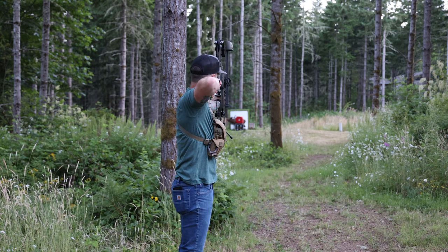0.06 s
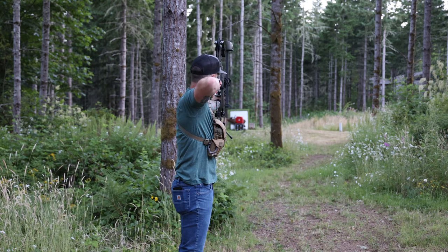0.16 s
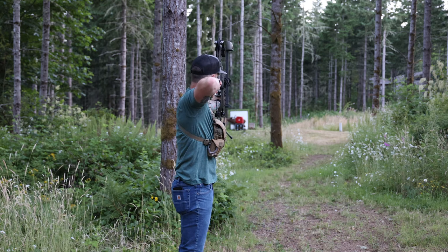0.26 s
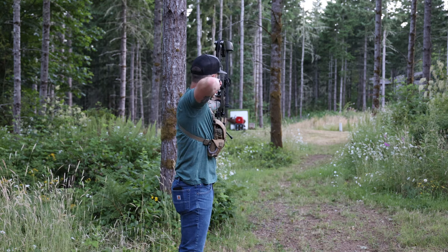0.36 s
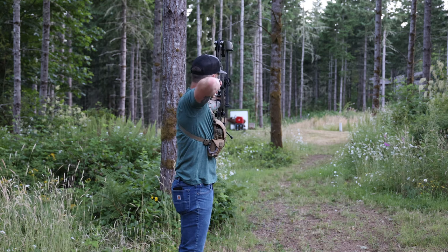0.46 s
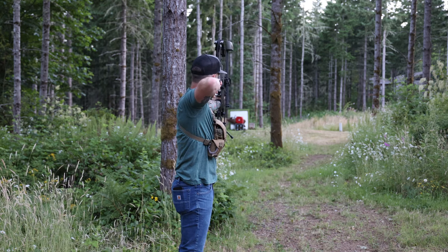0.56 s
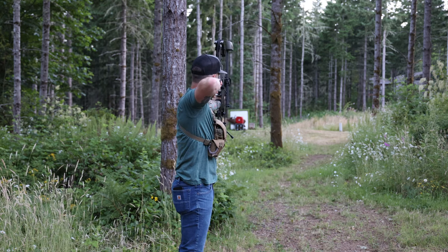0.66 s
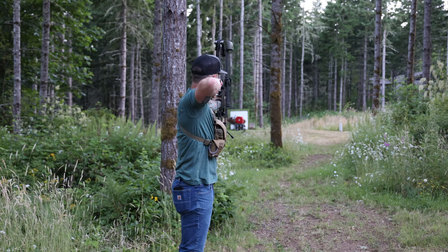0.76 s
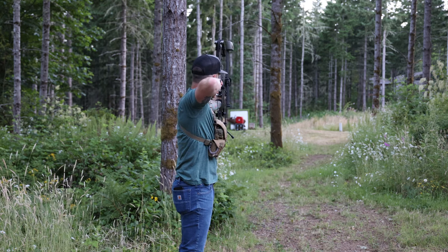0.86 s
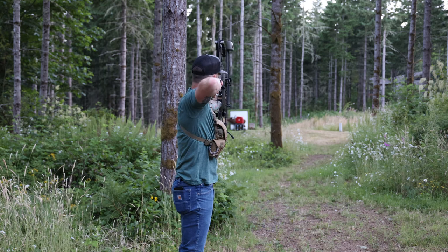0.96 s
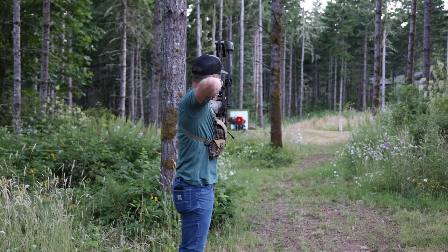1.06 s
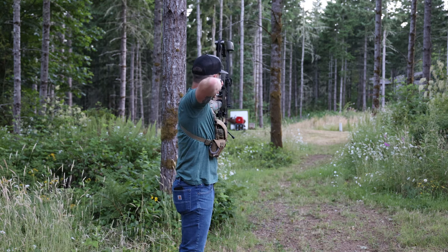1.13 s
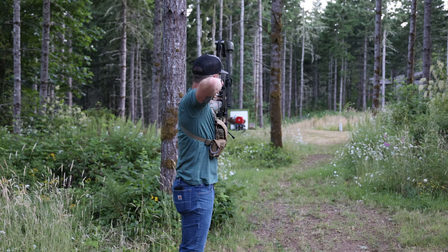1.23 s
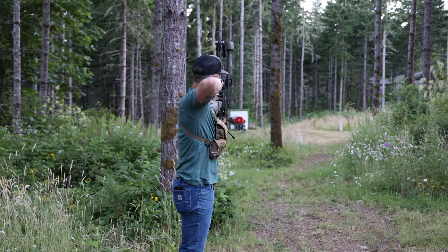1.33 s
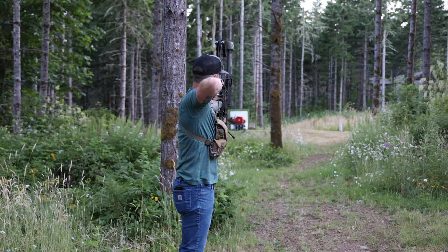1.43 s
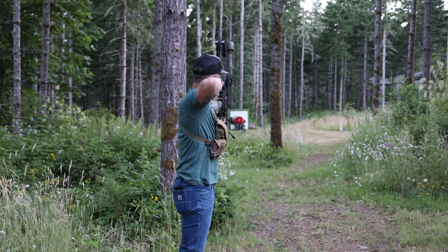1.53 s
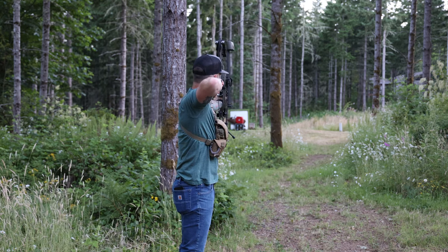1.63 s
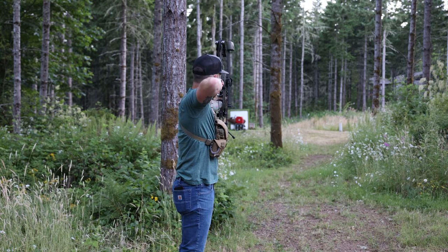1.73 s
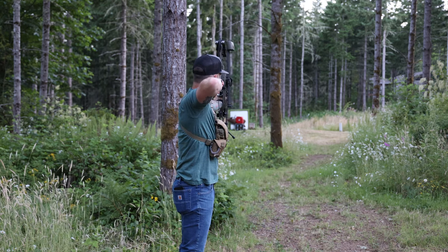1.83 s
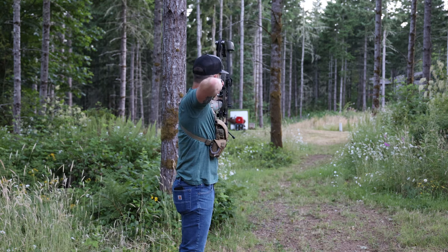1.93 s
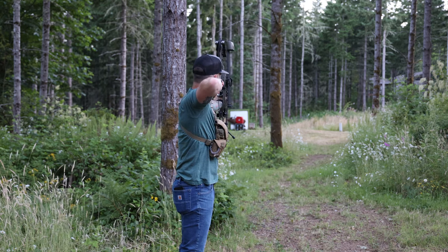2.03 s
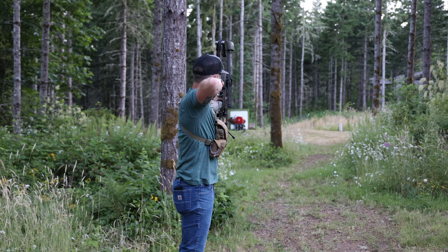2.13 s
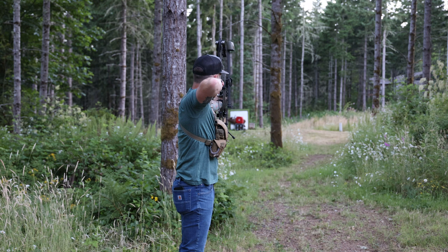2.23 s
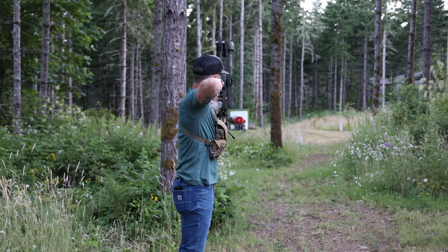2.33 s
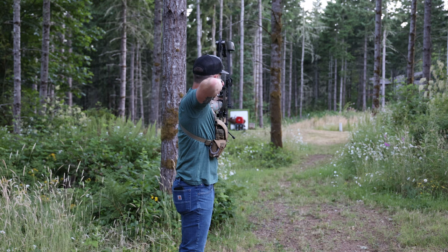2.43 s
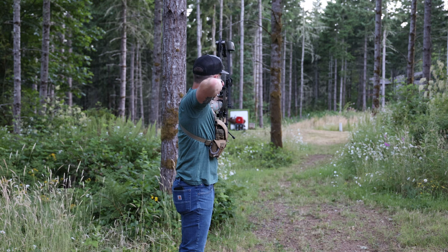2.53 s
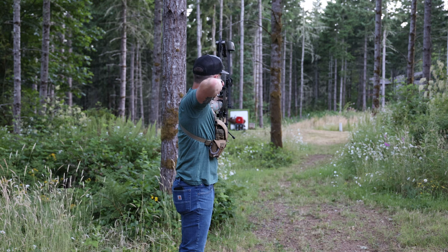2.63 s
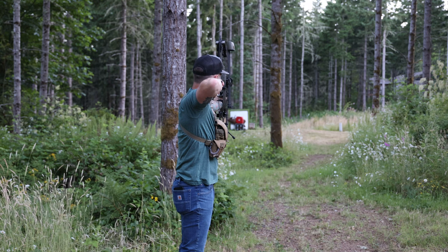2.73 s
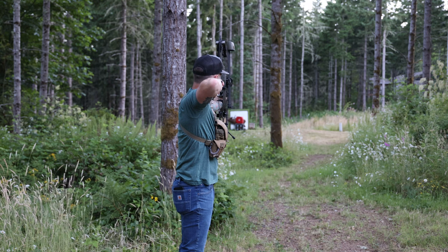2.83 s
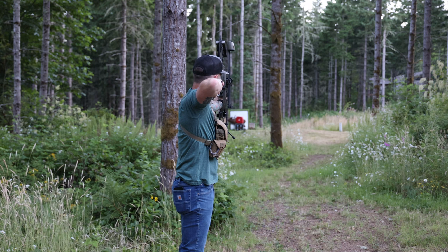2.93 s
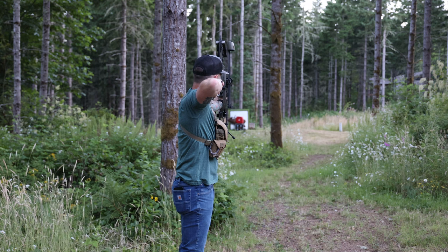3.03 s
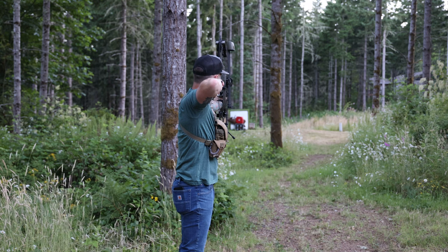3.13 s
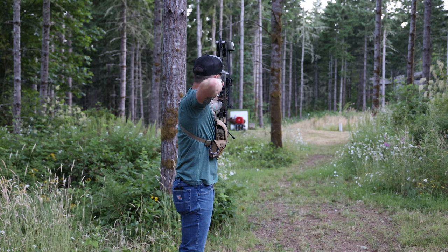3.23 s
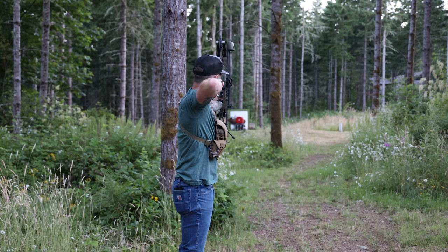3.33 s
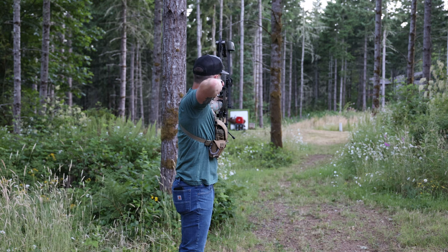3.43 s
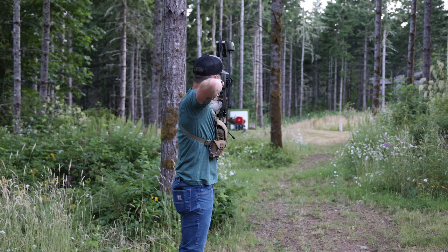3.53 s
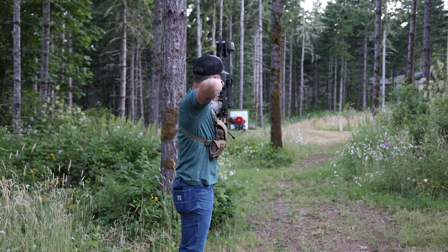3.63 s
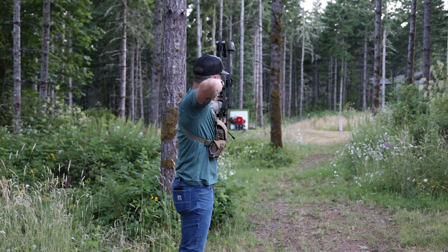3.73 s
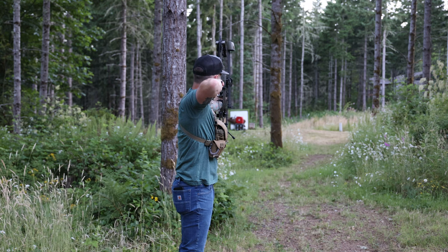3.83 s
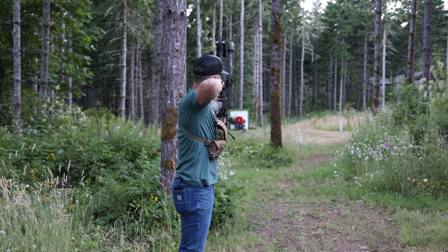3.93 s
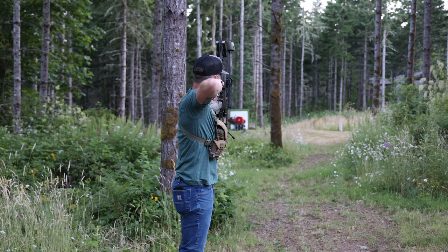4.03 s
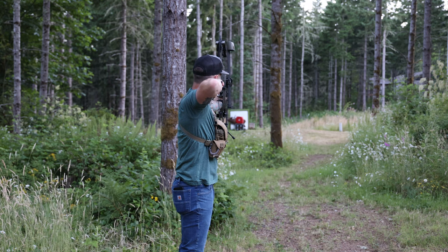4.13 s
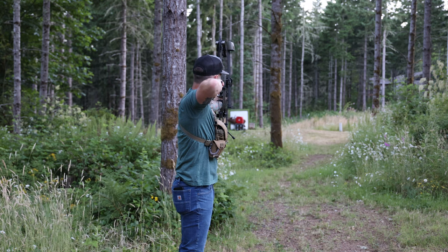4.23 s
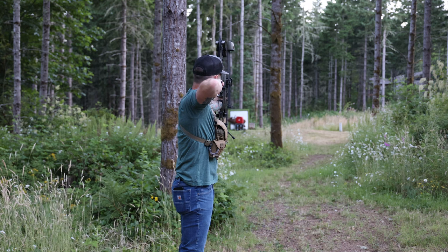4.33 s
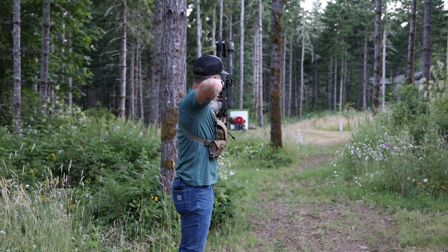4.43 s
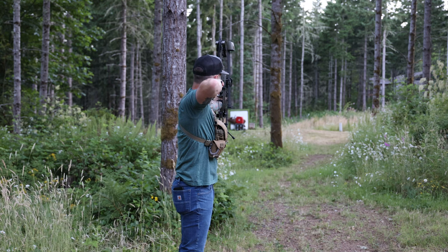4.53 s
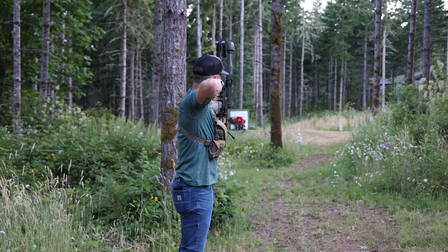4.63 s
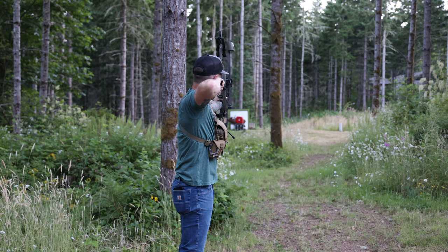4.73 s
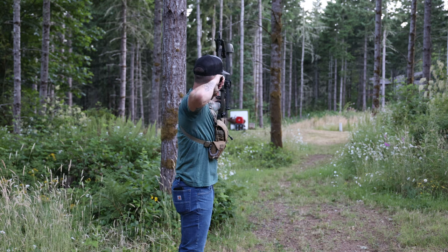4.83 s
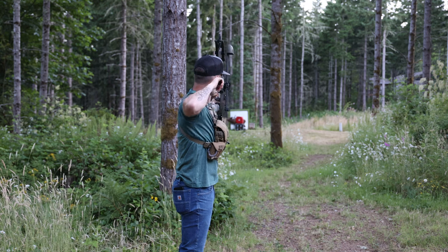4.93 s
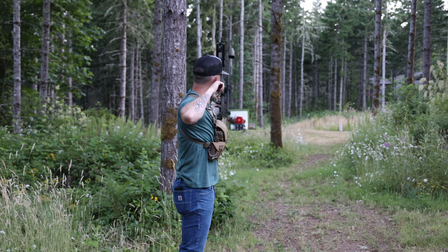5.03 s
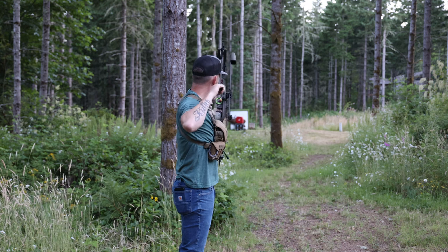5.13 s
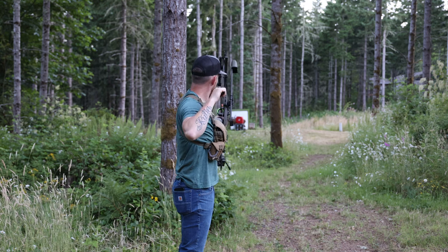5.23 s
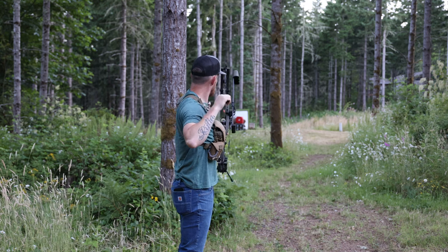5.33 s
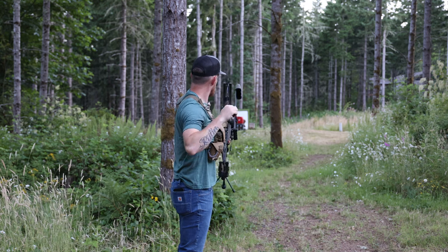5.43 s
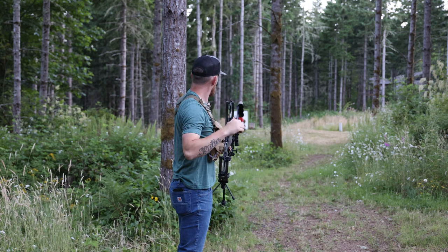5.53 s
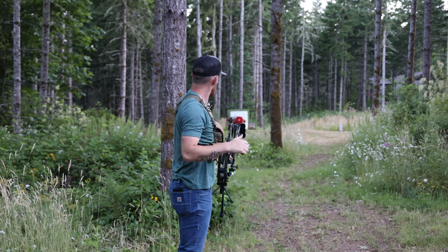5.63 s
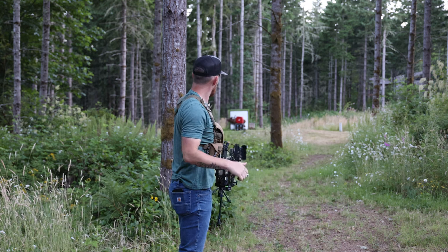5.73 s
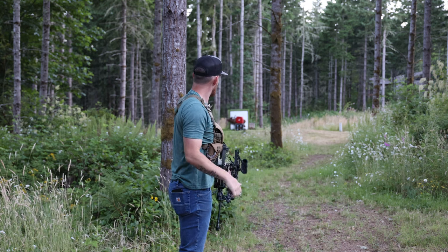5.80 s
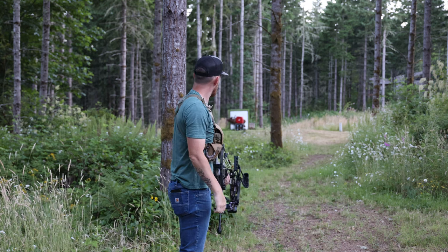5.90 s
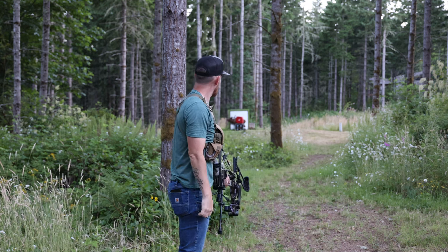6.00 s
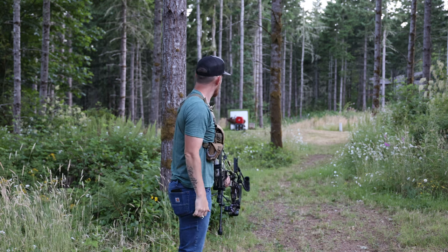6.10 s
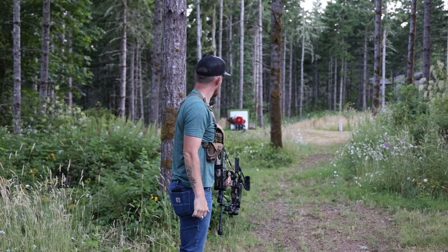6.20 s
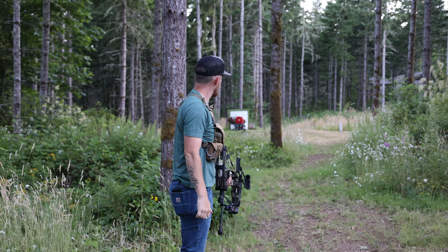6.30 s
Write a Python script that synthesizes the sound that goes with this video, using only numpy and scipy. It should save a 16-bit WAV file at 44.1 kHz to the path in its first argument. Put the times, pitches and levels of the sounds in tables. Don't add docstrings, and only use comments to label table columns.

```python
import sys
import numpy as np
from scipy import signal
from scipy.fft import rfft, irfft, next_fast_len
from scipy.io import wavfile
from scipy.ndimage import uniform_filter1d

SR = 44100
rng = np.random.default_rng(int(sys.argv[2]) if len(sys.argv) > 2 else 0)


def master(y):
    cut = np.clip(np.atleast_2d(y).T, -1, 1)
    pcm = np.round(cut * 32767)
    wavfile.write(sys.argv[1], SR, pcm.astype(np.int16))


def rack_gain(trim_db):
    fader = np.asarray(trim_db, float)
    return 10 ** (fader / 20)


N = 280476
T = np.arange(N) / SR
SHOT = slice(int(4.7 * SR), N)
IMPACT_S = 5.3441


def along(points, hz):
    p = np.array(points, float)
    return np.interp(np.log(np.maximum(hz, 1)), np.log(p[:, 0]), p[:, 1])


def level(x, db):
    return x * rack_gain(db) / np.sqrt(np.mean(x ** 2))


def colour(x, points):
    size = 2048
    cepstrum = irfft(along(points, np.fft.rfftfreq(size, 1 / SR)) * np.log(10) / 20)
    cepstrum[1:size // 2] *= 2
    cepstrum[size // 2 + 1:] = 0
    impulse = irfft(np.exp(rfft(cepstrum)))[:size // 2]
    return signal.oaconvolve(x, impulse)[:len(x)]


def ring(blows, modes):
    t = T[:SR // 4]
    body = np.zeros(len(t))
    for hz, db, t60, *sign in modes:
        body += np.prod(sign) * rack_gain(db) * np.sin(2 * np.pi * hz * t) * 1000 ** (-t / t60)
    return signal.fftconvolve(blows, body)[:len(blows)]


def taps(times, dbs):
    out = np.zeros(N + 1)
    for s, db in zip(times, dbs):
        i, part = divmod(s * SR, 1)
        out[int(i):int(i) + 2] += rack_gain(db) * np.array([1 - part, part])
    return out[SHOT]


def chatter(rows):
    t = T[SHOT]
    shape = np.zeros(len(t))
    for s, db, ms in rows:
        shape += rack_gain(db) * (t > s) * np.exp(-np.maximum(t - s, 0) * 1000 / ms)
    return shape * rng.standard_normal(len(t))


def walk(rate):
    k = int(SR / rate)
    held = np.repeat(rng.standard_normal(N // k + 1), k)
    return 1.3 * uniform_filter1d(uniform_filter1d(held, k), k)[:N]


def bands(noise, gain):
    size = next_fast_len(len(noise), True)
    spectrum = rfft(noise, size)
    octave = np.log2(np.maximum(np.fft.rfftfreq(size, 1 / SR), 1))
    out = 0
    for centre in np.arange(4.5, 14.6, .5):
        window = np.clip(1 - 2 * abs(octave - centre), 0, 1)
        out = out + gain(2 ** centre) * irfft(spectrum * window, size)[:len(noise)]
    return out


def wood(x, near_db, deep_db, onset_ms=3.0):
    # pitch_hz, t60_s
    near_decay = [(200, 0.5), (700, 0), (2000, .17), (5000, .19), (9000, .16), (15000, .11)]
    # pitch_hz, t60_s
    deep_decay = [(200, .5), (700, .8), (2000, .9), (5000, 1.1), (9000, 1.1), (15000, 1.2)]
    # pitch_hz, level_db
    bark = [(100, -23), (400, -6), (1000, -3), (2500, -3.5), (4500, -4), (6500, -4), (8500, -2),
            (11000, -3), (14000, -6.5)]
    t = T[:32000]

    def fade(hz):
        near = rack_gain(near_db) * 1000 ** (-t / along(near_decay, hz))
        deep = rack_gain(deep_db) * 1000 ** (-t / along(deep_decay, hz))
        return near + deep

    echoes = bands(rng.standard_normal(len(t)), fade) * (1 - np.exp(-t * 1000 / onset_ms))
    return signal.fftconvolve(x, colour(echoes, bark))[:len(x)]


def engines():
    # start_s, length_s, pitch_hz, level_db
    drones = [
        (-.1, 1.1, 72, -54),
        (0, .45, 201, -58),
        (1.15, 1.45, 64, -55),
        (2.5, .65, 60, -60),
        (3.35, .25, 59, -61),
        (2.75, .55, 120, -64),
        (5.65, .45, 189, -59),
    ]
    sag_per_s, swell_s = .01, .15
    out = np.zeros(N)
    for s, length, hz, db in drones:
        pitch = hz * (1 - sag_per_s * (T - s) + .015 * walk(6))
        edge = np.clip(np.minimum(T - s, s + length - T) / swell_s, 0, 1)
        loudness = np.sqrt(2) * edge * rack_gain(db + 2.5 * walk(5))
        out += loudness * np.sin(2 * np.pi * np.cumsum(pitch) / SR)
    return out


def road():
    # pitch_hz, level_db (per Hz)
    tyres = [(15, -44), (25, -18.5), (53, -8.5), (87, -14.5), (113, -10.5), (141, -12.5), (245, -8.5),
             (334, -13), (418, -8), (466, -9), (991, -1), (2300, -19.3), (5000, -37), (6500, -65),
             (11000, -120)]
    # time_s, length_s, rumble_db, upper_roar_db
    cars = [
        (0.05, .35, 4, 1),
        (3.0, .6, 2, 2),
        (5.1, .5, 2, 3),
    ]
    roar_db, fade_db_per_s = -41.4, -1.45
    roar = fade_db_per_s * (T - T.mean())
    low, top = .15 * roar, .6 * roar
    for s, length, low_db, top_db in cars:
        open_view = np.exp(-((T - s) / length) ** 2)
        low, top = low + low_db * open_view, top + top_db * open_view
    swell = walk(1.5)

    def gain(hz):
        rumble_tilt = np.clip(np.log2(600 / hz), 0, 1) * (low - roar)
        upper_tilt = np.clip(np.log2(hz / 1000), 0, 1) * (top - roar)
        flicker = .5 * min(hz / 600, 1) * swell + .5 * walk(9)
        return rack_gain(roar + rumble_tilt + upper_tilt + flicker)

    murmur = level(colour(rng.standard_normal(N), [(50, -25), (72, 0), (85, 0), (105, -25)]), -64)
    tyre_roar = bands(level(colour(rng.standard_normal(N), tyres), roar_db), gain)
    return murmur + tyre_roar + engines()


def birds():
    # start_s, peak_db, overtone_db, haze_db, throat_hz
    chips = [
        (0.2442, -29, -3, -18, 5600),
        (0.8497, -29.5, -2, -18, 5300),
        (1.6315, -29.5, -6, -15, 6300),
        (2.5846, -31, -5, -21, 5400),
        (3.2294, -28, -1, -22, 5800),
        (3.7323, -29, -3, -22, 5800),
        (4.2577, -30, -1, -20, 6000),
        (4.7662, -29, -4, -20, 5400),
        (5.1393, -36.5, -3.5, -15, 5400),
        (6.1913, -32.5, -6, -15, 6700),
    ]
    # middle_s, level_db, pitch_hz, length_ms
    whistles = [
        (0.6, -71, 7900, 70),
        (1.503, -66, 5000, 12),
        (1.53, -71, 5550, 50),
        (3.31, -64, 2500, 60),
        (4.655, -64, 6800, 8),
    ]
    # pitch_hz, level_db
    beak = [(1800, -18), (3000, 2), (4500, -1.5), (6500, 2.5), (7300, -4), (8600, 1), (10500, -7.5),
            (14000, -14)]
    top_hz, end_hz, fall_ms = 9900, 2300, 3.6
    throat_width_hz, upper_throat_hz, upper_throat_db = 600, 8400, -4
    ground_echo_ms, ground_echo_db = 6.2, -9
    near, scattered, t = np.zeros(N), np.zeros(N), T[:int(.02 * SR)]
    pitch = end_hz + (top_hz - end_hz) * np.exp(-(t * 1000 / fall_ms) ** 1.7)
    phase = 2 * np.pi * np.cumsum(pitch) / SR
    shape = (1 - np.exp(-t / .0006)) * np.exp(-(t / .0098) ** 2.5)

    def resonance(k, hz):
        return 1 / (1 + ((k * pitch - hz) / throat_width_hz) ** 2)

    for s, db, over_db, haze_db, throat_hz in chips:
        round_tones = beamed = 0
        for k, share_db in zip((1, 2, 3), (0, over_db, over_db - 11)):
            partial = rack_gain(db + share_db) * shape * (k * pitch < 14000) * np.sin(k * phase)
            round_tones = round_tones + (.25 + resonance(k, throat_hz)) * partial
            beamed = beamed + rack_gain(over_db + upper_throat_db) * resonance(k, upper_throat_hz) * partial
        twigs = rng.standard_normal(len(t)) * np.exp(-t / .006) * (t > .001)
        i = int(s * SR)
        near[i:i + len(t)] += round_tones + beamed
        j = i + int(ground_echo_ms * SR / 1000)
        near[j:j + len(t)] += rack_gain(ground_echo_db) * round_tones
        near[i:i + 2 * len(t) - 1] += rack_gain(haze_db - 8) * signal.fftconvolve(round_tones, twigs)
        scattered[i:i + len(t)] += rack_gain(haze_db) * round_tones
    for s, db, hz, length_ms in whistles:
        swell = np.exp(-((T - s) * 2000 / length_ms) ** 4)
        near += rack_gain(db + 1.5) * swell * np.sin(2 * np.pi * hz * T)
    return colour(near + wood(scattered, -14.5, -27, onset_ms=5.0), beak)


def flight():
    # pitch_hz, level_db
    vanes = [(1500, -22), (3500, -2), (6000, -8), (8300, -2), (10500, -12), (13300, -2), (16000, -14)]
    vanes_db, leaves_s, arrow_m_s, archer_m = -33, 4.842, 70, 6
    t = T[SHOT]
    metres = archer_m + arrow_m_s * np.maximum(t - leaves_s, 0)
    hiss = level(colour(rng.standard_normal(len(t)), vanes), vanes_db)
    flutter = rack_gain(2.5 * walk(40)[SHOT])
    in_flight = (t > leaves_s) & (t < IMPACT_S)
    return hiss * flutter * in_flight / metres


def target():
    # pitch_hz, level_db, t60_s, polarity
    skin_modes = [(4100, -12, .003, 1), (8300, -16, .005, -1), (13200, -11, .0018, 1)]
    # pitch_hz, level_db, t60_s
    foam_modes = [(130, -32, .1), (205, -30, .1), (300, -23, .06), (370, -32, .04), (1040, -36, .04),
                  (1550, -27, .03)]
    # pitch_hz, level_db
    all_round = [(200, -1), (600, 8), (1200, 6), (2700, -7), (4000, 0), (5800, -14), (8200, -10),
                 (12000, -27), (16000, -34)]
    dent_db, dent_ms, pierce_db, pierce_ms = -12, .31, -3, .19
    ground_ms, ground_db = 7, -14
    ms = (T[SHOT] - IMPACT_S) * 1000
    dent = rack_gain(dent_db) * np.sin(np.pi * np.clip(ms / dent_ms, 0, 1))
    through = (ms - dent_ms) / pierce_ms
    edge = np.clip(1 + through / .25, 0, 1) * np.clip(1 - (through - 1) / .6, 0, 1)
    crack = rack_gain(pierce_db) * edge * np.clip(.85 - 1.9 * through, -1.05, .85)
    skin = ring(taps([IMPACT_S + dent_ms / 1000], [0]), skin_modes)
    blow = taps([IMPACT_S], [0])
    thud = ring(blow, foam_modes)
    haze = wood(colour(blow, all_round), -23, -34, onset_ms=3.0)
    direct = dent + crack + skin + thud
    delayed = np.roll(direct, int(ground_ms * SR / 1000))
    mirrored = rack_gain(ground_db) * colour(delayed, [(1800, 0), (5000, -14)])
    return colour(direct + mirrored + haze, [(20, -30), (70, -8), (130, 0)])


def string():
    # time_s, pitch_hz, level_db
    glide = [
        (4.832, 2300, -50),
        (4.8355, 2500, -30),
        (4.8378, 3200, -12.5),
        (4.839, 3600, -26),
        (4.8405, 4600, -45),
    ]
    s, hz, db = np.transpose(glide)
    t = T[SHOT]
    loudness = rack_gain(np.interp(t, s, db - 7, left=-200, right=-200))
    whistle = loudness * np.sin(2 * np.pi * np.cumsum(np.interp(t, s, hz)) / SR)
    sheared_air = chatter([(4.8348, -26, 6), (4.8392, -17, .7)])
    return whistle + colour(sheared_air, [(3000, -25), (8000, -8), (13500, 0), (16000, -6)])


def bow():
    # time_s, click_db, rattle_ms
    clicks = [
        (4.8097, -18, .6),
        (4.8102, -3, .4),
        (4.8125, -14, 2.8),
        (4.8207, -24, .8),
        (4.8255, -33, 2),
    ]
    # pitch_hz, level_db
    jaw = [(300, -14), (1500, -6), (3000, -2), (6000, -10), (8400, -3), (10500, -5), (13500, -4),
           (16000, -13)]
    # time_s, limb_blow_db, cam_rattle_db, rattle_ms
    stops = [(4.8345, -46, -29, 4), (4.8392, -32, -16, 1), (4.8407, -13, -14, .5), (4.8414, -10, 2, 1.0),
             (4.8428, -3, -8, 1), (4.8453, -14, -4, 1.1), (4.847, -17, -13, 1.2), (4.8515, -17, -15, 3.5),
             (4.8605, -22, -22, 3), (4.868, -27, -30, 3), (4.877, -30, -26, 4)]
    # pitch_hz, level_db, t60_s
    limb_modes = [(880, -15, .04), (1060, -15, .035), (1230, -11, .045), (1310, -14, .06),
                  (1400, -1.5, .017), (1680, -6, .02), (1880, -17, .02)]
    # pitch_hz, level_db
    cam_metal = [(1180, -35), (2000, -17), (2300, -13), (2810, -3), (4190, -9), (4820, 2), (5630, -12),
                 (6940, -13), (8300, -3), (10500, -17), (12900, -11), (14800, -17), (16000, -28)]
    # time_s, pitch_hz, level_db, t60_s
    riser_modes = [
        (4.81, 320, -36, .05),
        (4.8403, 324, -9, .05),
        (4.8415, 745, -18, .04),
        (4.8445, 562, -23, .17),
        (4.845, 635, -24, .035),
        (4.874, 740, -25, .15),
        (4.876, 1040, -23, .04),
        (4.885, 400, -33, .05),
        (4.949, 1600, -38, .05),
    ]
    # pitch_hz, level_db
    spray = [(1200, -18), (2200, -8), (4800, -4), (6500, -9), (8300, -7), (11000, -17), (13600, -14),
             (16000, -26)]
    # pitch_hz, level_db
    low_cut = [(20, -38), (80, -9), (180, -9), (280, 0), (15600, 0), (16600, -25)]
    click = colour(chatter(clicks), jaw)
    zip_up = string()
    s, limb_db, cam_db, ms = np.transpose(stops)
    limbs = ring(taps(s, limb_db), limb_modes)
    riser = sum(ring(taps([start], [0]), [mode]) for start, *mode in riser_modes)
    cams = colour(chatter(zip(s, cam_db + 6, ms)), cam_metal)
    slam = colour(taps([4.842], [24]), spray)
    haze = wood(limbs + rack_gain(-6) * riser, -35, -56) + wood(slam + click, -35, -48)
    return colour(click + zip_up + limbs + riser + cams + haze, low_cut)


def scene():
    air = road() + birds()
    air[SHOT] += bow() + flight() + target()
    return np.tile(air, (2, 1))


def roll_off(x):
    return signal.sosfilt(signal.butter(12, 16470, fs=SR, output="sos"), x)


def record(dry):
    # pitch_hz, level_db (per Hz)
    preamp = [(2060, -30.5), (3500, -5.5), (5710, -6), (6960, -6), (14000, -8.5), (15000, -9),
              (16000, -17.5)]
    roof = signal.ellip(8, .3, 60, 15750, fs=SR, output="sos")
    mid, side = (signal.sosfilt(roof, level(colour(rng.standard_normal(N), preamp), -62)) for _ in range(2))
    drift = level(colour(rng.standard_normal(N), [(20, -5), (60, -6), (300, -22), (700, -38), (1200, -60)]), -77)
    difference = colour(side, [(2000, -20), (5000, -14), (8000, -13), (13000, -9)]) + drift
    wet = dry + mid + difference * np.array([[1], [-1]])
    overloaded = np.clip(wet, -.82, .82)
    top = signal.butter(12, 16250, fs=SR, output="sos")
    mix = signal.sosfilt(top, overloaded)
    return roll_off(mix)


dry = scene()
out = record(dry)
master(out)
```